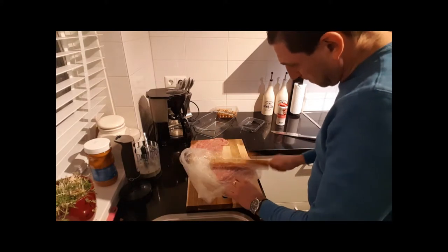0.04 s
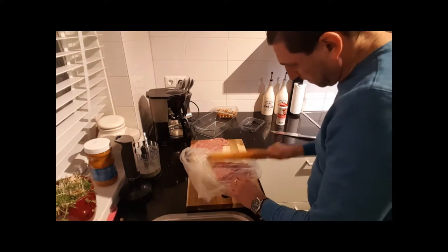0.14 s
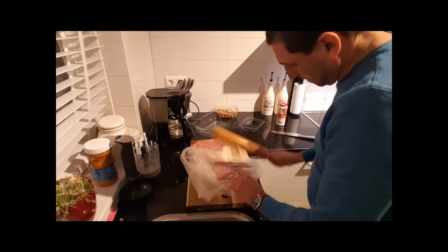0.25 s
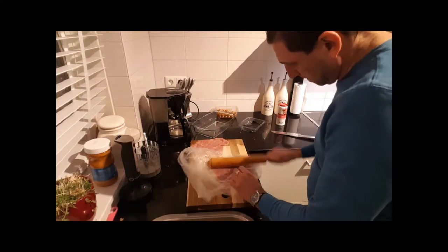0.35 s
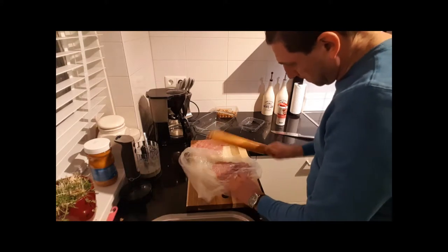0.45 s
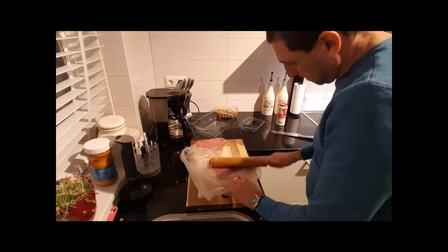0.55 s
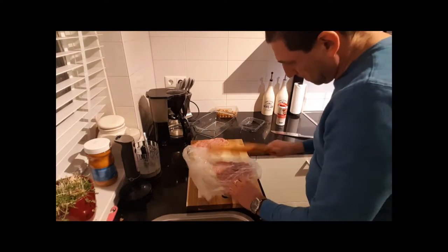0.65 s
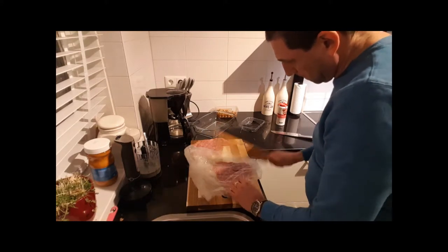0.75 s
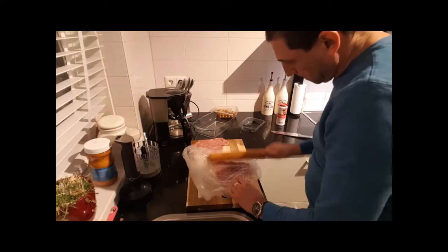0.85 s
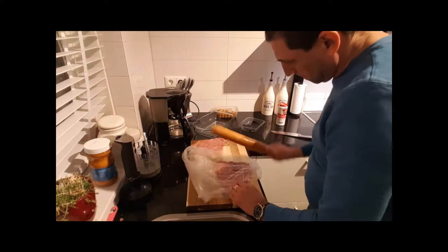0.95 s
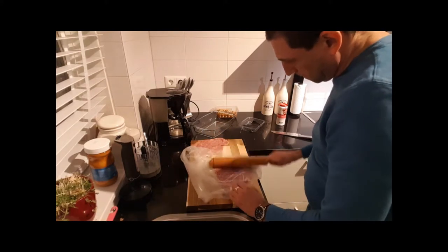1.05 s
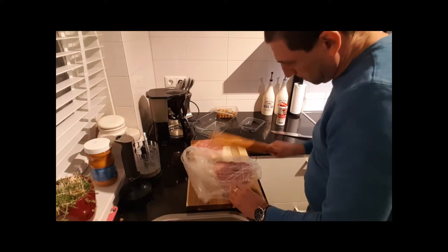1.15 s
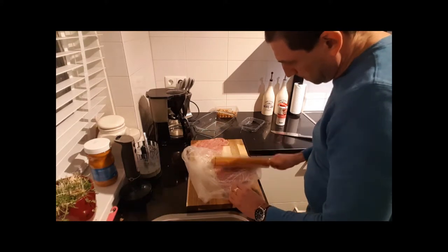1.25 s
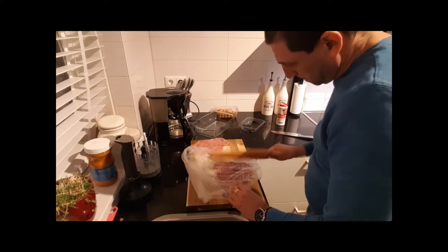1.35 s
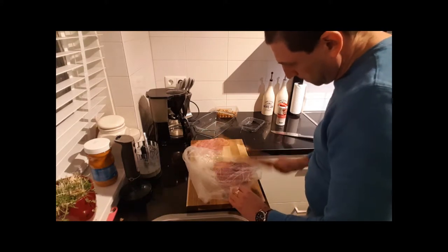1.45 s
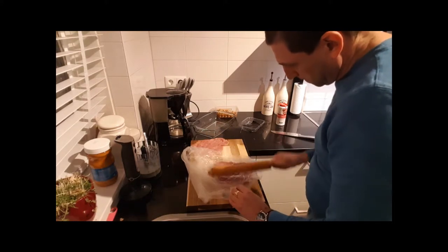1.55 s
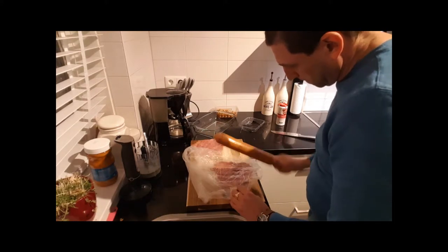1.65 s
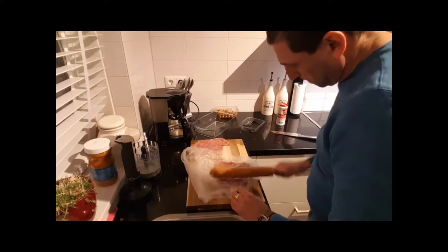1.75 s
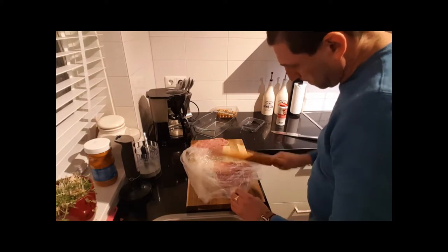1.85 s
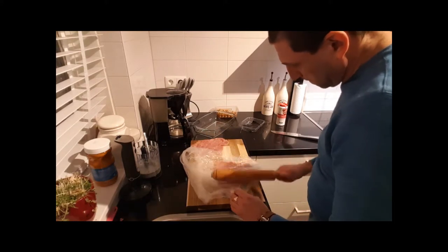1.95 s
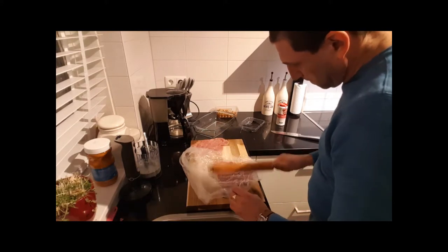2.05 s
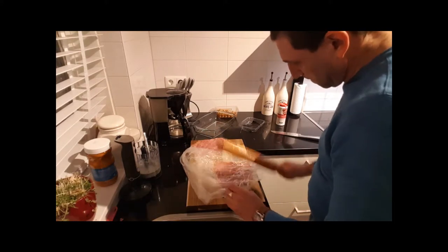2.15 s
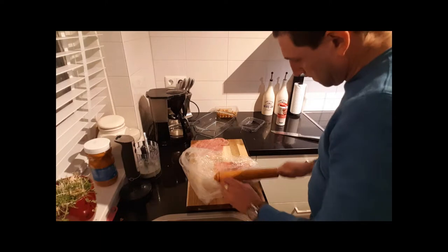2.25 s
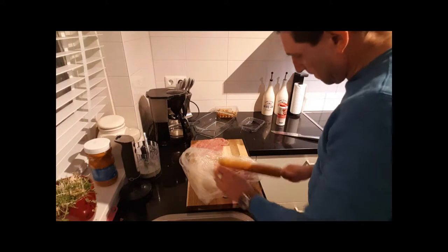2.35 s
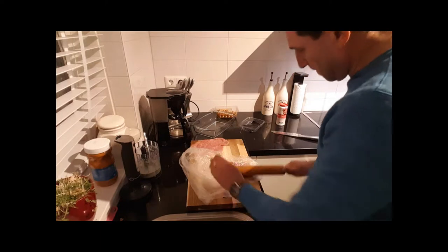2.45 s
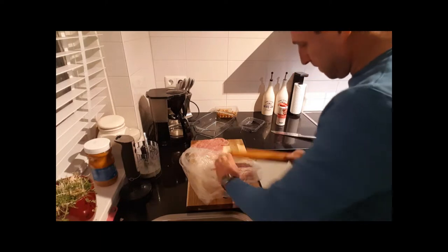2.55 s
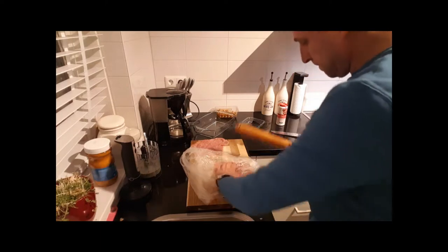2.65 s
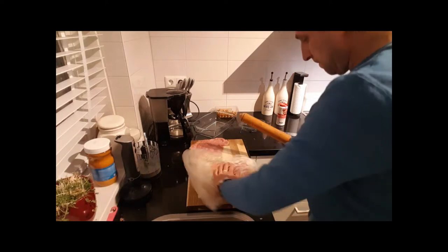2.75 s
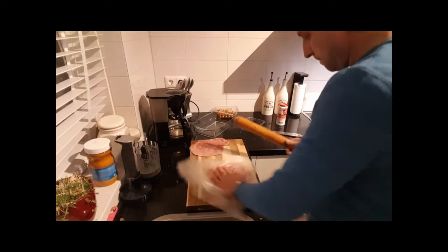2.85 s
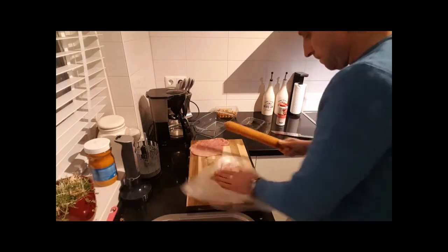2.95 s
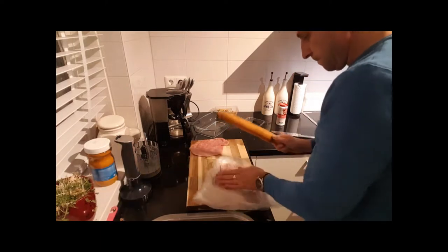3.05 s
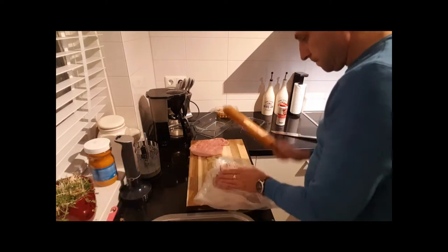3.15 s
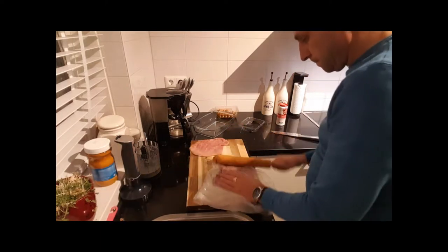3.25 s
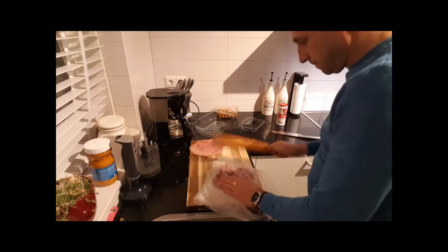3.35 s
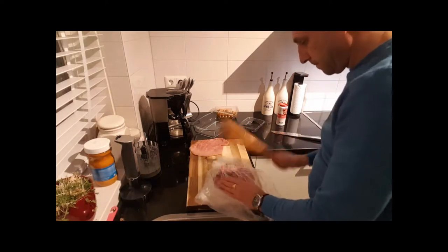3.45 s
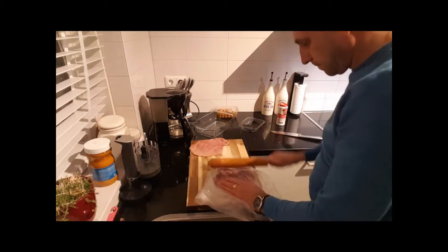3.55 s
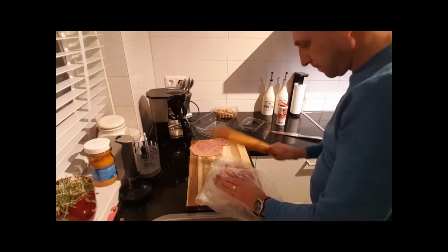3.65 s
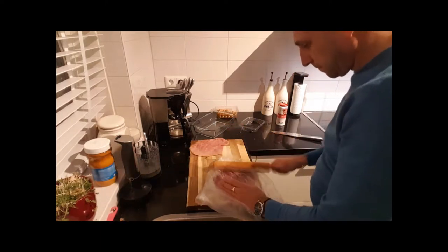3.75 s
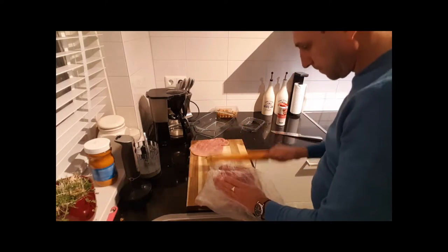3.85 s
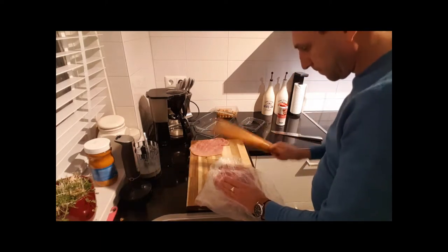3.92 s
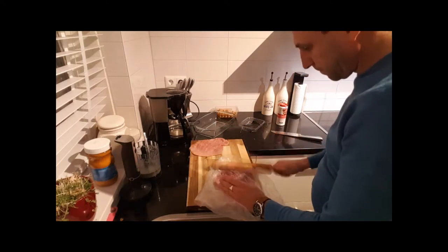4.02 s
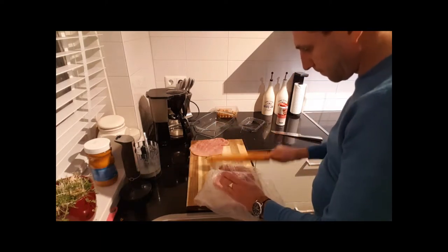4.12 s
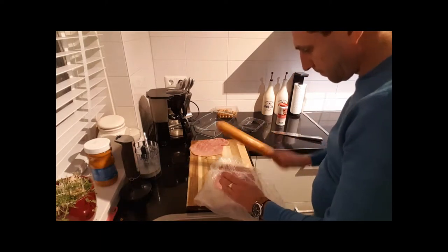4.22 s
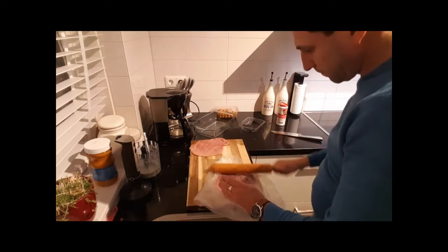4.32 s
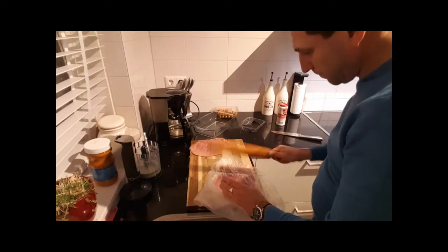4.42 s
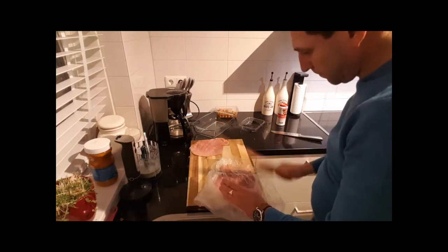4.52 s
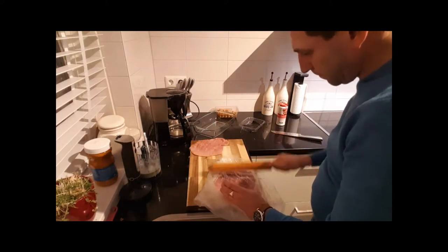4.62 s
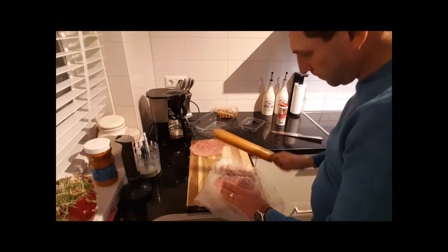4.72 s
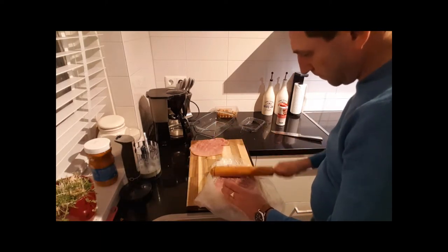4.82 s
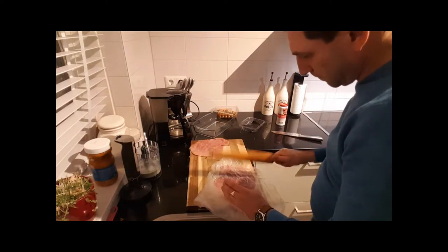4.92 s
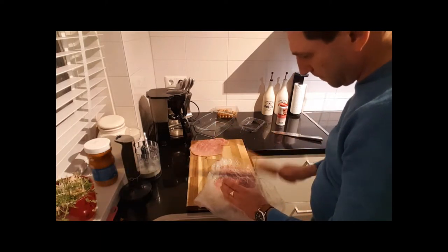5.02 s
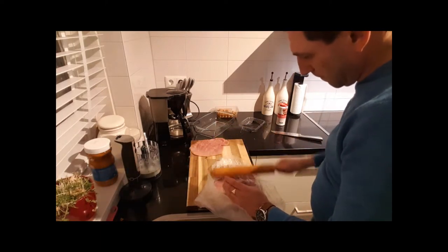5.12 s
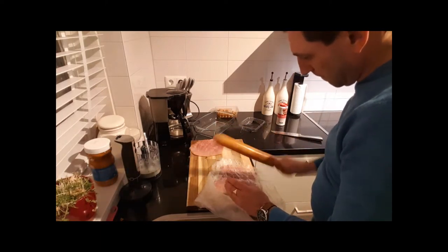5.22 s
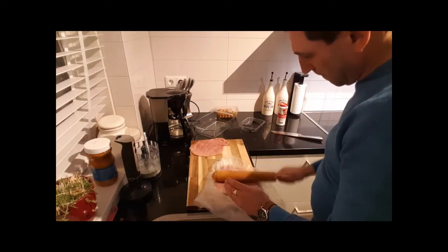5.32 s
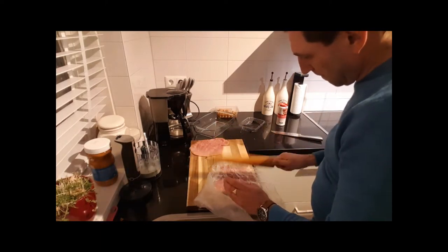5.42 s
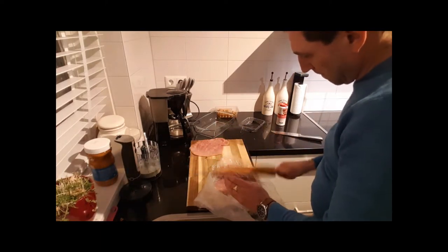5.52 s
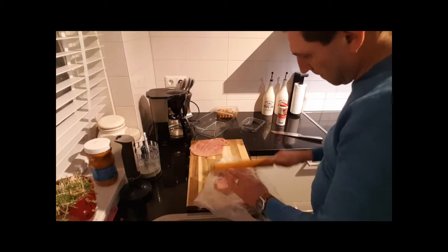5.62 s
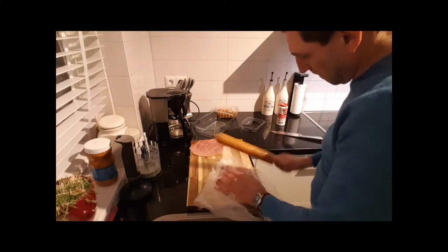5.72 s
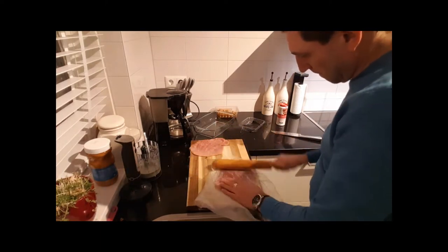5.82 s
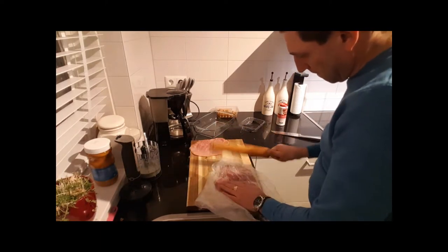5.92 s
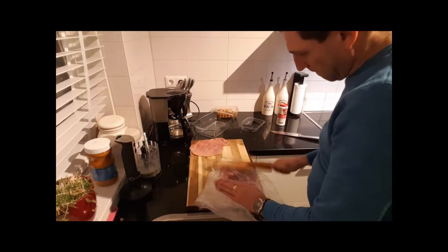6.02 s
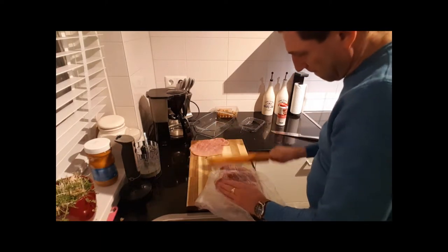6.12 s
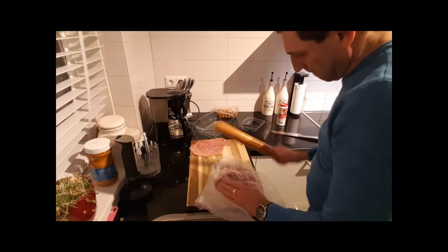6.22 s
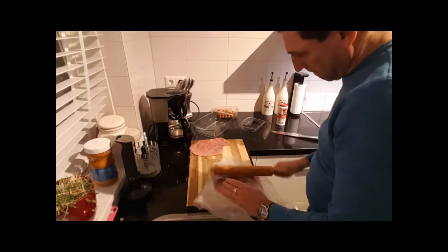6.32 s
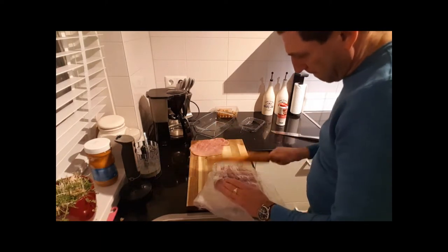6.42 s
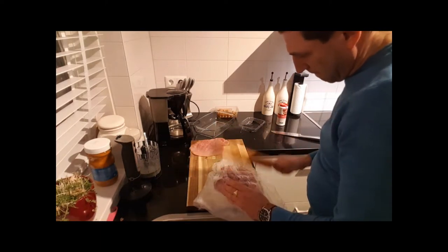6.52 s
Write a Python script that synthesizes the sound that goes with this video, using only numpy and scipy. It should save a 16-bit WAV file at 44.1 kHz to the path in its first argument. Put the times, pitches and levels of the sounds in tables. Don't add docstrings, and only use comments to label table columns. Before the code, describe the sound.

A rolling pin beats meat inside a plastic bag on a wooden board, roughly four blows a second. Each gives a deep hollow thud, a wet flat slap and a short plastic crackle, with board rattle and worktop boom. Midway the pounding stops, the bag slides softly with a rustle, then a harder blow restarts the same rhythm. Close stereo microphones in a small tiled kitchen, loud and slightly squashed.

```python
import sys
import numpy as np
from scipy import signal
from scipy.fft import rfft, irfft, next_fast_len
from scipy.io import wavfile
from scipy.ndimage import uniform_filter1d

SR = 44100
rng = np.random.default_rng(int(sys.argv[2]) if len(sys.argv) > 2 else 0)


def inscribe(sig):
    pcm = np.round(np.clip(np.atleast_2d(sig).T, -1, 1) * 32767)
    wavfile.write(sys.argv[1], SR, pcm.astype(np.int16))


def level_to_linear(level):
    exponent = np.asarray(level, float) / 20
    return 10 ** exponent


N = 289721

# thud_s, strength_db, board_knock_over_thud_db, flat_slap_over_thud_db
PIN_BLOWS = [(-0.0274, -16, -10, -5), (0.204, -16.5, -9.5, -4.5), (0.4386, -18, -8, -4),
             (0.6744, -22.5, -7, -9.5), (0.9183, -18, -9, -4.5), (1.1584, -21.5, -4.5, -4.5),
             (1.3936, -16, -7.5, -6.5), (1.62, -18.5, -10.5, -3.5), (1.8555, -18.5, -9.5, -3),
             (2.092, -17.5, -10, -3), (2.3352, -17, -9.5, -2), (2.521, -27.5, -14, -8.5),
             (3.3706, -12.5, -9, -6.5), (3.6322, -17, -7, -4.5), (3.894, -24, -7.5, -2),
             (4.1659, -17, -9.5, -4), (4.42, -19, -8.5, -3), (4.679, -18, -10, -3.5),
             (4.9282, -24, -6.5, 4), (5.1813, -18, -11.5, -4), (5.429, -17, -8, -2),
             (5.6678, -25.5, -9, -11.5), (5.908, -18.5, -9.5, -3.5), (6.1657, -19, -7.5, -3.5),
             (6.4361, -18, -8, -3.5)]
# pitch_hz, t60_s, left_db, right_db, sign (which way it swings first)
LOW_RING = [(42.3, 0.64, -25.1, -28.2, 1), (62.4, 0.33, -25.1, -26.2, 1),
            (76.3, 0.45, -26.4, -29.3, -1), (91.9, 0.46, -32.1, -31.0, 1),
            (117.0, 0.37, -25.6, -23.9, 1), (137.4, 0.76, -39.0, -38.2, 1),
            (174.9, 0.8, -39.3, -40.0, -1), (185.0, 0.8, -28.1, -26.3, 1),
            (184.8, 0.22, -16.1, -15.1, -1), (192.6, 0.32, -24.9, -22.3, -1),
            (208.0, 0.8, -33.6, -35.1, -1), (223.9, 0.23, -19.0, -16.3, -1),
            (227.2, 0.53, -24.1, -26.4, 1),
            (238.1, 0.58, -35.1, -24.0, 1), (258.5, 0.45, -27.0, -27.0, -1),
                (276.0, 0.65, -45.2, -28.0, -1), (283.5, 0.42, -26.3, -25.3, 1),
                (294.7, 0.8, -38.6, -40.8, 1), (310.6, 0.8, -38.1, -37.0, -1),
                (328.1, 0.28, -30.3, -33.1, 1), (354.0, 0.54, -38.2, -36.3, -1),
                (393.6, 0.22, -29.9, -29.1, 1), (423.4, 0.25, -30.7, -30.1, -1),
                (468.4, 0.48, -39.0, -35.6, 1), (506.4, 0.28, -39.2, -34.8, -1),
                (599.3, 0.28, -32.7, -29.3, 1)]
# pitch_hz, t60_s, left_db, right_db, sign
BOARD_RING = [(595, 0.16, -28, -34, -1), (605, 0.36, -35, -38.5, 1), (704, 0.45, -32, -52, 1),
              (854, 0.38, -33, -42, -1), (973, 0.23, -54, -65, 1), (1045, 0.47, -40.5, -47, -1),
              (1310, 0.3, -35, -71, 1), (1970, 0.44, -64, -54, 1), (2380, 0.32, -49, -35.5, -1),
              (2800, 0.93, -62, -61, 1)]
# pitch_hz, level_db (per Hz)
RATTLE_COLOUR = [(350, -4), (600, -5.5), (1000, -4.5), (1600, -10), (2550, -15), (3400, -18.5),
                 (5900, -28.5), (8400, -29.5), (11000, -29), (13500, -26.5), (17000, -60)]
# pitch_hz, level_db (per Hz)
CRACK_COLOUR = [(400, -23.5), (1500, -8), (4000, -11.5), (8000, -16), (11000, -14.5), (13500, -13),
                (15500, -14)]
# pitch_hz, likeness (1 = the same)
LIKENESS = [(60, 0.71), (180, 0.77), (550, 0.6), (1650, 0.022), (4970, 0.015), (15000, -0.0)]
# pitch_hz, left_minus_right_db
BALANCE = [(60, 4), (150, -3), (380, 1), (950, -3), (2380, -2.5), (5980, -2), (15000, 4.5)]
# time_s, drag_db
BAG_SLIDE = [
    (2.76, -79),
    (2.80, -61),
    (2.942, -57.5),
    (3.034, -52),
    (3.072, -55.5),
    (3.122, -52.5),
    (3.19, -58.5),
    (3.28, -71),
    (3.35, -57),
]
# pitch_hz, level_db (per Hz)
DRAG_COLOUR = [(180, -43), (300, -16), (518, -10.5), (2040, 4), (3880, -1), (4530, -4), (4990, -0.5),
               (7820, -7), (8500, -4), (11000, -35), (18700, -120)]
# pitch_hz, level_db (per Hz)
HISS_COLOUR = [(5290, -38), (9000, 2), (12000, 10), (15800, 10.5)]
# pitch_hz, level_db (per Hz)
QUIET_COLOUR = [(18, -31), (30, -6), (287, -5), (554, -13), (801, -7), (1160, -9), (1760, -12.5),
                (6050, -21), (16000, -27)]
# pitch_hz, level_db (per Hz)
RUMBLE_COLOUR = [(15, -36), (25, 1), (54, 10.5), (102, -8), (140, 3.5), (260, -23), (340, -42.5),
                 (570, -120)]
# pitch_hz, rattle_t60_s, room_t60_s, room_over_rattle_db
DYING = [(394, 0.34, 0.63, -5), (942, 0.048, 0.7, -7), (2240, 0.12, 0.81, -6.5), (3975, 0.075, 0.68, -6),
         (6840, 0.067, 0.54, -6), (11050, 0.1, 0.59, -13), (14000, 0.31, .33, 1)]

BAND_EDGES_HZ = 28.6 * 2 ** np.arange(0, 9.4, 0.4)
LEAD_IN = round(0.06 * SR)
USUAL_THUD_DB, USUAL_KNOCK_DB = -19, -24
BAG_LEAD_S = 0.0028
CRACK_DB, CRACK_PER_DB, CRACK_TOP_DB = -33, 1.73, -29.5
CRACK_PER_SLAP = 0.2
SHEEN_SHARE = 0.43


def at_hz(points, hz):
    points = np.array(points)
    return np.interp(np.log(hz), np.log(points[:, 0]), points[:, 1])


def bands(x, low_hz):
    for k, (low, high) in enumerate(zip(BAND_EDGES_HZ, BAND_EDGES_HZ[1:])):
        if low > low_hz:
            band_filter = signal.butter(3, [low, high], "band", fs=SR, output="sos")
            yield np.sqrt(low * high), signal.sosfilt(band_filter, x[k % 2])


def spread(mid, side, hz):
    alike = np.clip(at_hz(LIKENESS, hz), 0, 1)
    balance = level_to_linear(at_hz(BALANCE, hz) * np.array([[0.5], [-0.5]]))
    return balance * (np.sqrt(1 + alike) * mid + np.sqrt(1 - alike) * side * [[1], [-1]])


def stereo_noise(colour):
    white = rng.standard_normal((2, 2, N))
    noise = sum(level_to_linear(at_hz(colour, hz)) * spread(*band, hz) for hz, band in bands(white, low_hz=20))
    return noise / np.sqrt(np.mean(noise ** 2) + 1e-20)


def stepped_noise(samples):
    return np.repeat(rng.standard_normal(N // samples + 1), samples)[:N]


def swell(at, level_db, rise_s, t60):
    power = np.full(N + LEAD_IN, 1e-18)
    power[at] = level_to_linear(2 * level_db)
    up, down = np.exp(-1 / (rise_s * SR)), level_to_linear(-120 / (t60 * SR))
    rise = [(1 - up) ** 2, 0, 0, 1, -2 * up, up * up]
    decay = [1, 0, 0, 1, -down, 0]
    return signal.sosfilt([rise, decay], power)[LEAD_IN:]


def blows():
    thud_s, thud_db, knock_db, slap_db = np.transpose(PIN_BLOWS)
    crack_db = CRACK_DB + CRACK_PER_DB * (thud_db - USUAL_THUD_DB) + CRACK_PER_SLAP * (slap_db + 3.5)
    crack_db = np.minimum(crack_db, CRACK_TOP_DB)
    return thud_s - BAG_LEAD_S, thud_s, thud_db, thud_db + knock_db, thud_db + slap_db, crack_db


def slap():
    touch_s, _, _, knock_db, slap_db, crack_db = blows()
    touch = LEAD_IN + np.round(touch_s * SR).astype(int)
    creases = level_to_linear(5.5 * stepped_noise(30))
    bumps = level_to_linear(2.5 * uniform_filter1d(stepped_noise(150), size=100))
    sheen_db = SHEEN_SHARE * (crack_db + 35) - 22.5
    out = 0
    for hz, band in bands(rng.standard_normal((2, 2, N)), low_hz=260):
        blow_db = np.array([at_hz([(550, knock), (1700, flat), (7000, crack + 12), (13000, sheen)], hz)
                            for knock, flat, crack, sheen in zip(knock_db, slap_db, crack_db, sheen_db)])
        rattle_t60, room_t60, room_db = [at_hz(np.array(DYING)[:, [0, column]], hz) for column in (1, 2, 3)]
        crack = swell(touch, blow_db + at_hz(CRACK_COLOUR, hz) + 17.5, rise_s=0.0018, t60=0.013) * creases
        body_db = blow_db + at_hz(RATTLE_COLOUR, hz) + 19
        meat = swell(touch, body_db + 1, rise_s=0.006, t60=0.11)
        rattle = swell(touch, body_db, rise_s=0.011, t60=rattle_t60) * bumps
        room = swell(touch, body_db + room_db, rise_s=0.0028, t60=room_t60)
        out = out + np.sqrt(np.abs(crack + meat + rattle + room)) * spread(*band, hz)
    return out


def boom():
    _, thud_s, thud_db, knock_db, slap_db, _ = blows()
    at = LEAD_IN + np.round((thud_s - 0.001) * SR).astype(int)
    out = 0
    for hz, t60, left_db, right_db, sign in LOW_RING + BOARD_RING:
        if hz < 340:
            level_db = thud_db - USUAL_THUD_DB
        else:
            level_db = (knock_db if hz < 900 else slap_db) - USUAL_KNOCK_DB + 4.5
        if hz < 130:
            level_db = level_db * 0.4
        if 560 < hz < 620:
            level_db = level_db + knock_db + 29
        vary_db = at_hz([(400, 1.9), (1000, 1.3)], hz)
        clicks = np.full(N + LEAD_IN, 1e-18)
        clicks[at] = level_to_linear(level_db + vary_db * rng.standard_normal(len(at)))
        r, w = level_to_linear(-60 / (t60 * SR)), 2 * np.pi * hz / SR
        ring = signal.lfilter([0, np.sin(w)], [1, -2 * r * np.cos(w), r * r], clicks)
        out = out + sign * level_to_linear(np.array([[left_db], [right_db]])) * ring
    soft = signal.butter(2, 4500, fs=SR, output="sos")
    return signal.sosfilt(soft, out)[:, LEAD_IN:]


def house():
    return level_to_linear(-67) * stereo_noise(QUIET_COLOUR) + level_to_linear(-65) * stereo_noise(RUMBLE_COLOUR)


def slide():
    last_s, last_db = BAG_SLIDE[-1]
    s, drag_db = np.transpose(BAG_SLIDE + [(last_s + 0.02, last_db)])
    hiss_db = -60 + 1.1 * (drag_db + 61.5)
    t = np.arange(N) / SR
    drag, hiss = [level_to_linear(np.interp(t, s, db, left=-120, right=-120)) for db in (drag_db, hiss_db)]
    creases = level_to_linear(0.67 * stepped_noise(300))
    return creases * (drag * stereo_noise(DRAG_COLOUR) + hiss * stereo_noise(HISS_COLOUR))


def scene():
    return slap() + boom() + house() + slide()


def capsule(x):
    size = next_fast_len(N)
    hz = np.arange(size // 2 + 1) * SR / size
    presence_db = -3 * 0.5 * (1 + np.tanh((hz - 2860) / 120))
    top_db = -8.5 * 0.5 * (1 + np.tanh((hz - 8500) / 150))
    return irfft(rfft(x, size) * level_to_linear(presence_db + top_db), size)[:, :N]


def limiter(x, ceiling_db, release_db_per_s, attack_s):
    release_db = release_db_per_s * np.arange(N) / SR
    level_db = 20 * np.log10(np.abs(x).max(axis=0) + 1e-9)
    held_db = np.maximum.accumulate(level_db + release_db) - release_db
    r = np.exp(-1 / (attack_s * SR))
    gain_db = signal.lfilter([1 - r], [1, -r], np.minimum(ceiling_db - held_db, 0))
    return x * level_to_linear(gain_db)


def roll_off(x):
    return signal.sosfilt(signal.butter(12, 16980, fs=SR, output="sos"), x)


def record(dry):
    ports = signal.butter(2, 80, "high", fs=SR, output="sos")
    top_cut = signal.cheby2(14, 26, 15950, fs=SR, output="sos")
    heard = capsule(signal.sosfilt(ports, dry))
    held = limiter(heard, ceiling_db=-7.5, release_db_per_s=125.5, attack_s=0.0022)
    rounded = 0.68 * np.tanh(held / 0.69)
    return roll_off(signal.sosfilt(top_cut, rounded))


dry = scene()
out = record(dry)
inscribe(out)
```